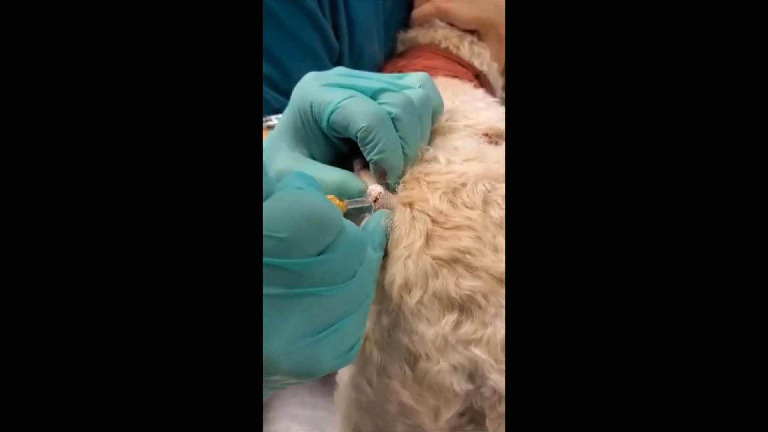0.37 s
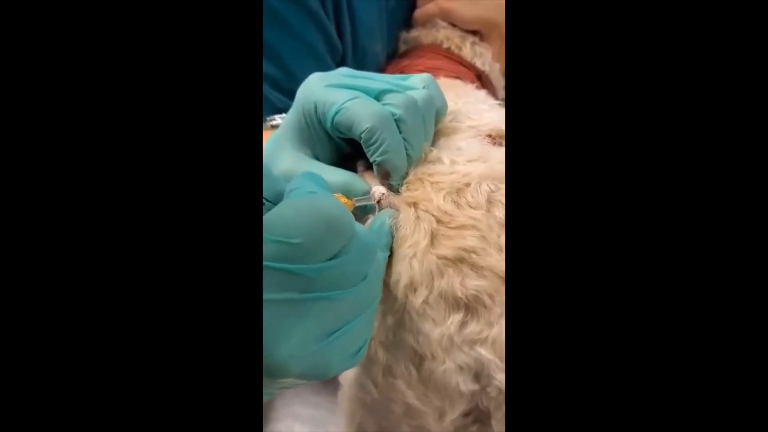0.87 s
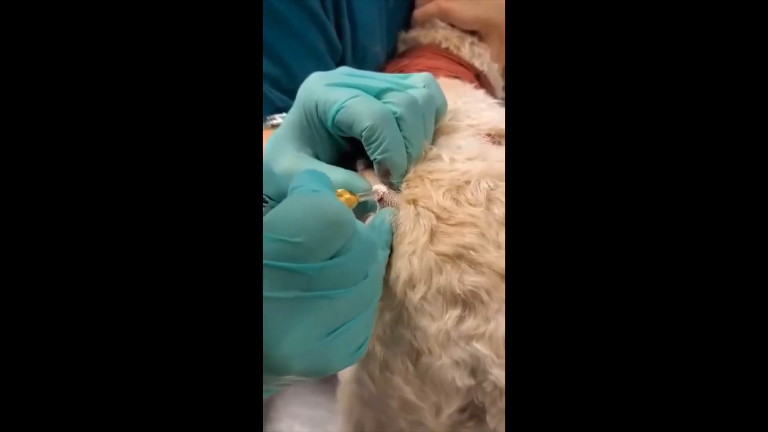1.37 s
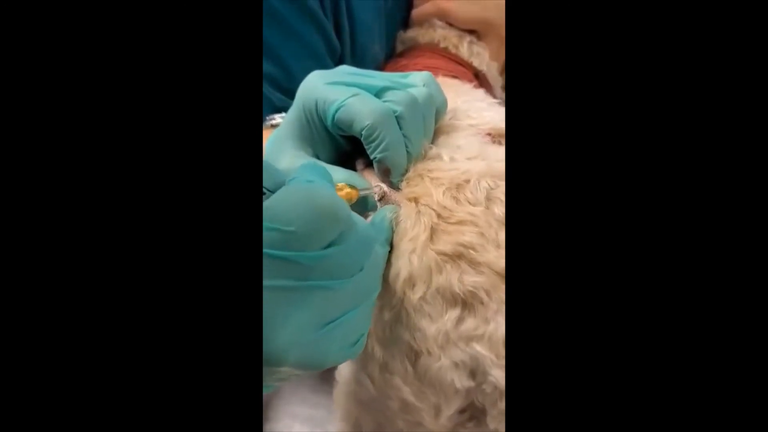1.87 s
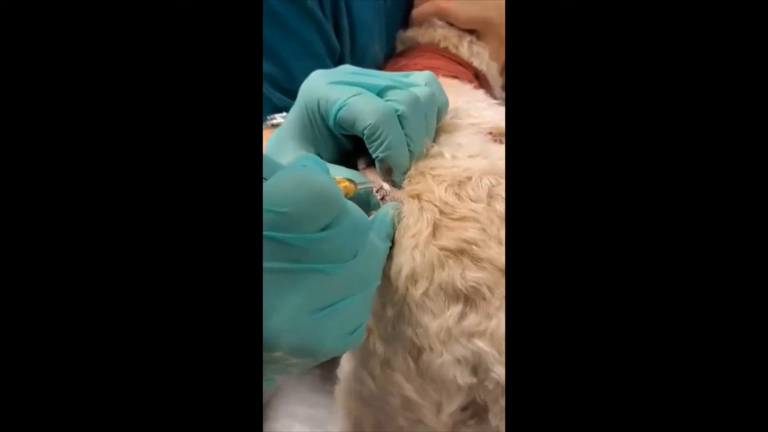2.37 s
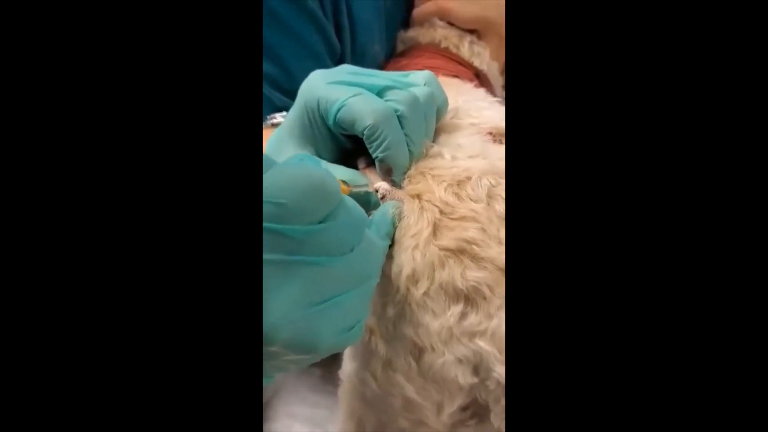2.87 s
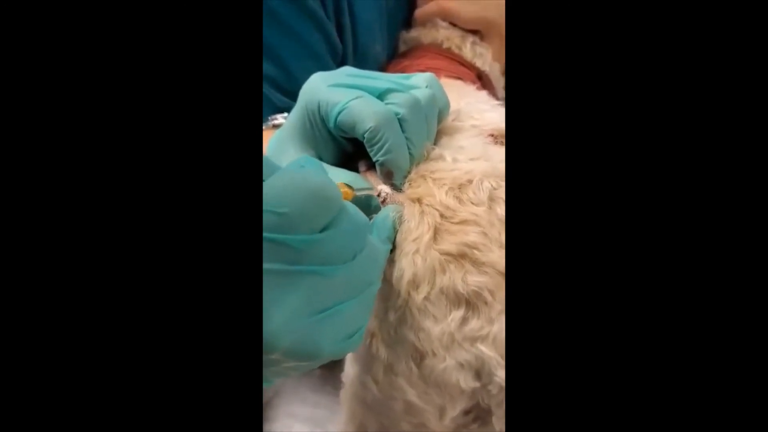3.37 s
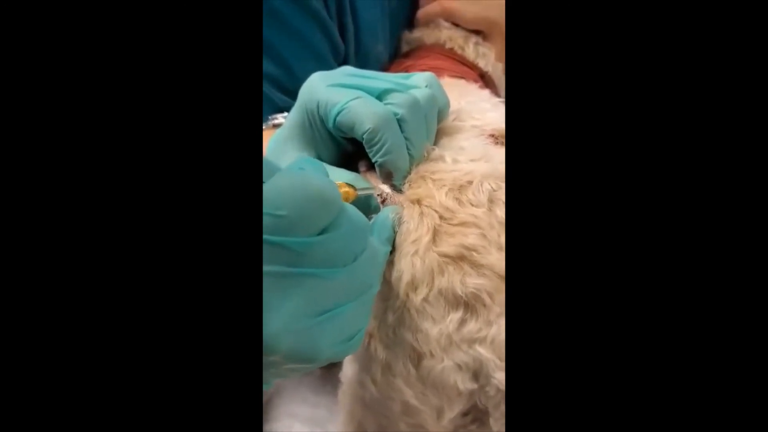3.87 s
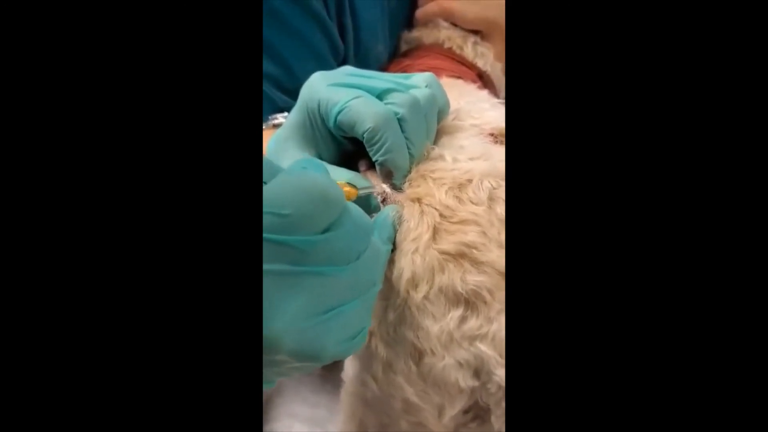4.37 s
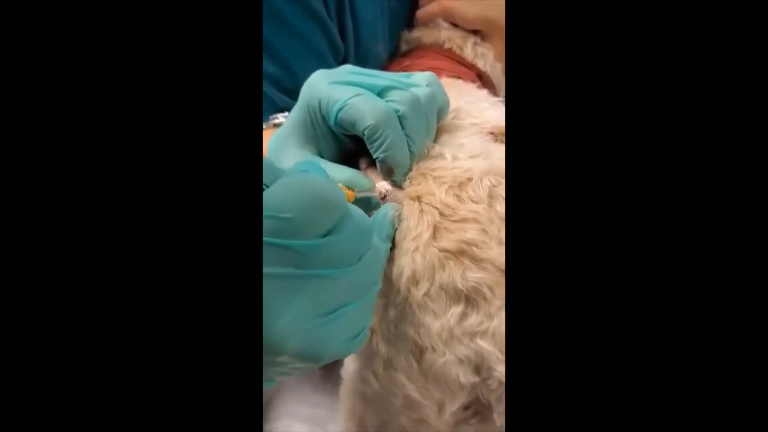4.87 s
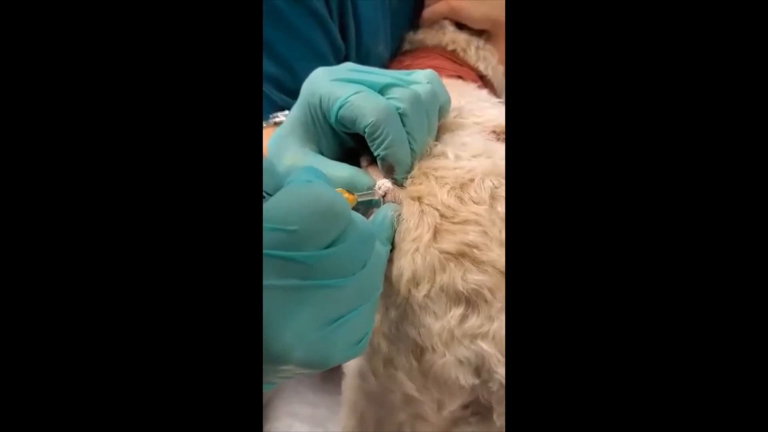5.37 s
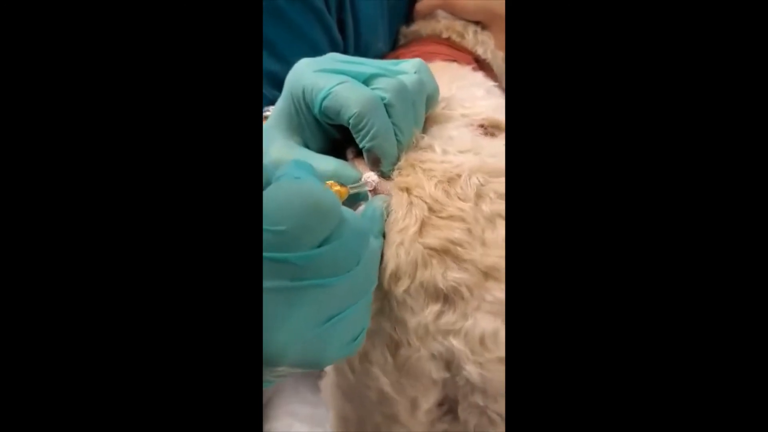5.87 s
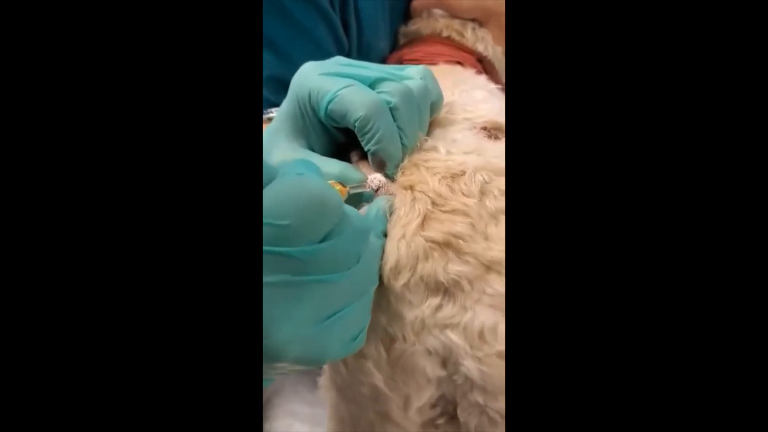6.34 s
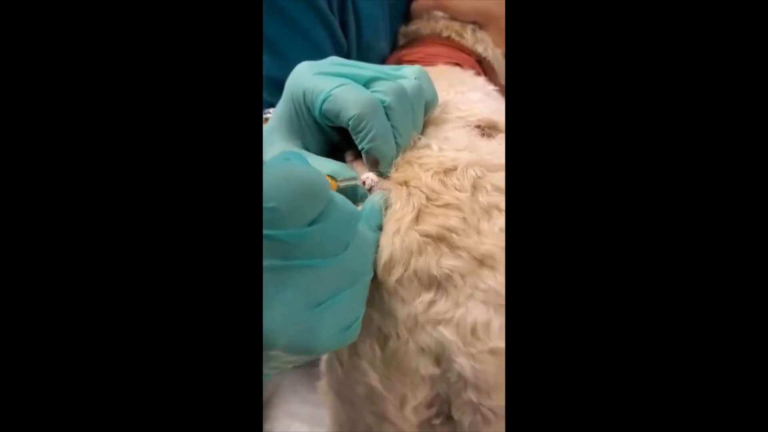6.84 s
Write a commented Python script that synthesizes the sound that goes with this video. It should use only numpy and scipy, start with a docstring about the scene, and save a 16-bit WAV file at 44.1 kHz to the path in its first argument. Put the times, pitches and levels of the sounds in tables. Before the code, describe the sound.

Close stereo pickup in a small, quiet clinic room: a continuous thin hiss of cold gas, very bright and sputtery, surges in quick sweeps. Softer airy spread lies under it. Sparse frosty clicks snap here and there, gloved fingers lightly rustle fur, and low fans drone. The hiss holds steadier around the middle, then pulses again; a barely felt low push comes late, among busier rustling.

```python
"""A freezing pen sprays cold gas on skin, close to a two-port microphone in a small clinic room.
From the start, filtered noise gives the fizz, which surges four or five times a second as the jet sweeps,
and summed wavering tones and low noise give fans, motors and room air. Soft noise strokes soon brush
glove on fur; from 1.4 s decaying sines tick like frost. The surges pause at about 3.5 s, and
after they resume one low sine pulse pushes at 5.5 s; the sweeps go on to the end."""
import sys
import numpy as np
from scipy import signal
from scipy.fft import rfft, irfft
from scipy.io import wavfile
from scipy.ndimage import uniform_filter1d

SR = 44100
rng = np.random.default_rng(int(sys.argv[2]) if len(sys.argv) > 2 else 0)


def transcribe(u):
    """Save the signal u as a 16-bit wav file named by the first command-line argument.

    u: samples, shape (n,) or (channels, n), limited to [-1, 1]; the rate is SR.
    q: integer samples, one column per channel.
    """
    v = np.clip(np.atleast_2d(u).T, -1, 1)
    q = np.round(v * 32767).astype(np.int16)
    wavfile.write(sys.argv[1], SR, q)


def invert_db(level):
    """Linear amplitude ratio for a level in decibels (20 dB per decade), elementwise."""
    return 10 ** (np.asarray(level, dtype=float) / 20)


N = 307818  # samples

# Surges as the jet sweeps over the spot: t/s, swell/dB, half length to 1/e of the swell/s
SWEEP_SURGES = [(0.156, 5.5, 0.034), (0.258, 4, 0.082), (0.38, 3.5, 0.048), (0.633, 3.5, 0.1),
                (0.852, 3.5, 0.11), (1.07, 4, 0.059), (1.27, 6.5, 0.066), (1.49, 4, 0.077),
                (1.717, 3.5, 0.12), (1.927, 5.5, 0.088), (2.18, 4.5, 0.089), (2.43, 6, 0.072),
                (2.62, 4, 0.027), (2.864, 3, 0.062), (3.072, 3.5, 0.024), (3.278, 2, 0.033),
                (3.847, -0.5, 0.013), (4, 2, 0.029), (4.177, 2.5, 0.052), (4.42, 2.5, 0.11),
                (4.657, 5, 0.033), (4.866, 6, 0.063), (5.088, 4.5, 0.059), (5.31, 5, 0.11),
                (5.57, 4.5, 0.05), (5.707, 4.5, 0.038), (5.927, 7.5, 0.13), (6.256, 4.5, 0.045),
                (6.567, 7, 0.082), (6.798, 7, 0.065), (6.97, 4.5, 0.018)]
# Jet between surges: t/s, level/dB, left over right/dB (only its departure from the mean acts)
JET_COURSE = [(0, -51.5, 0.5), (1, -51.5, 0.5), (2.2, -50.5, 1.5), (3.4, -47, 4), (4.4, -49.5, 1.5),
              (5.4, -52.5, 0), (5.7, -50, 3), (5.9, -52.5, -5.5), (6.3, -52, -2), (6.98, -51, -0.5)]
# Colour of the jet at each port: f/Hz, left relative level/dB, right relative level/dB
JET_COLOUR = [(8400, -20, -21), (8760, -21, -8.5), (9560, -8, -8.5), (9890, -6.5, -1), (9860, -15, -4),
              (10740, -12.5, -2.5), (11000, -10, -6), (10930, -4.5, 0.5), (12040, 2, -3), (12540, -5.5, -5),
              (12950, 8, -0.5), (13050, -6, -8)]
# Gas spreading over skin and fur, before surges and spurts:
# t/s, level/dB, left over right/dB (only its departure from the mean acts)
SPREAD_COURSE = [(0, -58.5, 5), (.3, -56, 4.5), (.7, -57.5, 3.5), (2, -58, 5.5), (3.3, -57, 4.5),
                 (4.1, -58, 6), (5.1, -57, 3), (5.6, -58.5, 4), (6.2, -59.5, 6), (6.98, -58.5, 6)]
# Colour of the spreading gas: f/Hz, left relative level/dB, right relative level/dB
SPREAD_COLOUR = [(1850, -10, -12.5), (1995, -24.5, -23.5), (2340, -12.5, -9), (3340, -8, -17),
                 (3370, -11, -14), (4000, -3, -14.5), (4200, -15, -9), (4660, -1.95, -16), (5600, -3, -11),
                 (5700, -3.5, -13), (6850, -3.5, -13), (7100, -4, -14), (7300, -3.5, -14),
                 (7500, -6.5, -13), (8100, -2, -9)]
# Likeness of the two ports once their delay is taken out: f/Hz, coherence/1
PORT_COHERENCE = [(150, 0.94), (330, 0.29), (1000, 0.18), (1900, 0), (2600, 0.42), (4200, 0.11),
                  (5900, 0.25), (7700, 0.65), (9500, 0.18), (11500, 0.34), (12900, 0.45)]
# Frost ticks, level before onset and decay: t/s, level/dB, ring f/Hz, left over right/dB
FROST_TICKS = [(1.448, -33.5, 5900, 12), (2.1609, -35.5, 5200, 17), (2.3673, -32, 5740, 19),
               (3.0017, -35.5, 5600, 19), (3.1143, -40, 6590, 2.5), (3.2033, -36.5, 5680, 21),
               (3.9658, -36, 5600, 20), (4.3765, -33, 5600, 12), (4.616, -34.5, 5240, -5),
               (5.2173, -34.5, 4660, -2), (5.474, -42, 5370, 6.0), (6.013, -38, 5630, -2),
               (6.2523, -40, 5900, 21), (6.2573, -39, 5500, 14), (6.2625, -41, 5200, 14)]
# Swishes of glove on fur: t/s, level/dB, centre f/Hz, half width to 1/e/Hz, rise from 1/e/s, left over right/dB
GLOVE_SWISHES = [(0.22, -58, 4000, 2500, 0.014, 6), (2.4, -57.5, 3500, 2000, 0.015, 6),
                 (2.843, -57, 4200, 2000, 0.012, 8), (3.455, -62, 4000, 2500, 0.027, 10),
                 (4.597, -59, 6000, 1500, 0.016, 2), (4.792, -59, 5360, 900, .014, 12),
                 (5.222, -54.5, 2300, 1500, 0.0075, 2), (5.26, -56.5, 2800, 1500, 0.014, 6),
                 (5.835, -55, 4730, 2500, 0.026, 10.5), (5.87, -54, 6500, 2940, 0.069, 1),
                 (5.915, -55.5, 5200, 1200, 0.05, 1)]
# One low soft push: t/s, level/dB, f/Hz, half length to 1/e/s
LOW_PUSH = (5.5, -55, 26, 0.06)
# Hum of fans and motors: f/Hz, level/dB, left over right/dB, wavering rate/Hz, steady share of power/1
MOTOR_TONES = [(26.7, -79.5, -3, 1.7, 0.5), (60.3, -77, -8, 4.7, 0.07), (77.8, -64, 2, 11.3, 0.54),
               (106.2, -69, 6, 11.2, 0), (119.5, -68.5, 2.5, 1.5, 1), (155.9, -63.5, -0.3, 3.5, 0.91),
               (234.2, -75, -8.5, 4.2, 0.33), (408.5, -81, -20.5, 2.6, 0.84), (474, -82, 0, 1.2, 0.83),
               (530, -90.5, 2, 0.45, 1), (825, -85, 8, 0.48, 0.94), (954, -93, 15, 0.45, 0.9),
               (1234, -86.5, -11, 0.21, 0.6)]
# Colour of the room air: f/Hz, left relative level/dB, right relative level/dB
AIR_COLOUR = [(20.1, -9, 4), (44.5, 3, -6), (88, 3.5, 7.5), (125, 0.5, 2.5), (209, -2.5, 2),
              (327, -5.5, -4.5), (367, -3, -7), (710, -7.5, -5.5), (1025, -11.5, -10.5), (1280, -14, -15),
              (1660, -38, -22), (2100, -23, -48)]


def evened(x):
    """Normalisation: the root mean square becomes one."""
    return x / np.sqrt(np.mean(x ** 2) + 1e-20)


def read(points, hz):
    """Interpolation: spectrum columns are linear in level over log frequency."""
    f, *columns = np.transpose(points)
    return np.array([np.interp(np.log(hz + 1), np.log(f + 1), c) for c in columns])


def sides(pan_db):
    """Interaural level difference: half is added at the left and half taken off at the right."""
    return invert_db(np.array([pan_db / 2, -pan_db / 2]))


def smooth_chance(width_s):
    """Low-pass random process: two running means of width_s leave a slow drift of unit rms."""
    size = max(round(width_s * SR), 1)
    drift = uniform_filter1d(rng.standard_normal(N), size)
    return evened(uniform_filter1d(drift, size))


def noise(colour, lo_hz, hi_hz, patchy_db, size, bins=10, hops=8):
    """Coherence: the right port shares part of the left's noise, delayed; patches span bins and hops."""
    port_lag_s = 0.000156
    frames = 4 * N // size + 5
    hz = np.fft.rfftfreq(size, 1 / SR)
    a, b, c, d, patches = rng.standard_normal((frames, len(hz), 5)).T
    patches = uniform_filter1d(patches, bins, 0)
    patches = evened(uniform_filter1d(patches, hops, 1))

    coherence = np.clip(read(PORT_COHERENCE, hz)[0], -1, 1)[:, None]
    left, separate = a + 1j * b, c + 1j * d
    delay = np.exp(-2j * np.pi * hz * port_lag_s)[:, None]
    right = coherence * left * delay + np.sqrt(1 - coherence ** 2) * separate
    z = np.array([left, right])

    # steep skirts outside the band
    inside = 1 / np.sqrt((1 + (lo_hz / (hz + 1)) ** 16) * (1 + (hz / hi_hz) ** 16))
    z *= (inside * invert_db(read(colour, hz)))[:, :, None] * invert_db(patchy_db * patches)
    out = signal.istft(z, nperseg=size, noverlap=3 * size // 4)[1][:, :N]
    return out / np.std(out.mean(0))


def played(course, sound, swell_db, lean_db):
    """Amplitude modulation: level and side follow a course plus the surges."""
    s, level_db, pan_db = np.transpose(course)
    t = np.arange(N) / SR
    pan_db = np.interp(t, s, pan_db) + lean_db
    # the colour already holds the mean side
    return sound * invert_db(np.interp(t, s, level_db) + swell_db) * sides(pan_db - pan_db.mean())


def sweep_swell():
    """Superposition in level: each sweep over the spot adds a bell-shaped swell in dB."""
    t = np.arange(N) / SR
    return sum(db * np.exp(-((t - s) / length) ** 2) for s, db, length in SWEEP_SURGES)


def flash_spurts():
    """Flash evaporation: droplets turn to gas at the nozzle in millisecond spurts and slower flutter."""
    return evened(invert_db(1.1 * smooth_chance(0.0015) + 0.8 * smooth_chance(0.017)))


def jet(swell_db, spurts):
    """Jet noise: a high broad band follows the spurts and swells with each sweep."""
    fizz = noise(JET_COLOUR, lo_hz=7820, hi_hz=14050, patchy_db=3, size=512, bins=4, hops=16)
    lean_db = 0.8 * swell_db  # a swell leans to the left
    return played(JET_COURSE, fizz * spurts, swell_db, lean_db)


def spreading_gas(swell_db, spurts):
    """Surface-flow noise: a lower band follows the same spurts and sweeps more weakly."""
    body = noise(SPREAD_COLOUR, lo_hz=1085, hi_hz=8920, patchy_db=2.0, size=512, bins=5, hops=14)
    return played(SPREAD_COURSE, body * spurts ** 0.45, 0.27 * swell_db, 0)


def ticks():
    """Impulse excitation: a snap, its echo off the glove and smaller cracks each start a damped ring."""
    onset_s, ring_t60_s = 0.0004, 0.004
    echo_s, echo_db = 0.0021, -5
    crackle_db, crackle_t60_s, crackles_per_s = -7, 0.06, 3000
    t = np.arange(1500) / SR
    out = np.zeros((2, N + len(t)))
    for s, db, hz, pan_db in FROST_TICKS:
        ring = np.minimum(t / onset_s, 1) * invert_db(-60 * t / ring_t60_s) * np.sin(2 * np.pi * hz * t)
        when, size = rng.random((2, len(t)))
        cracks = (when < crackles_per_s / SR) * (2 * size - 1) * (t > echo_s)
        impulses = invert_db(crackle_db - 60 * t / crackle_t60_s) * cracks
        impulses[0] = 1  # the snap
        impulses[round(echo_s * SR)] = invert_db(echo_db)
        tick = signal.fftconvolve(impulses, ring)[:len(t)]
        at = round(s * SR)
        out[:, at:at + len(t)] += invert_db(db) * sides(pan_db)[:, None] * tick
    return out[:, :N]


def swishes():
    """Friction noise: broad grainy bands follow strokes that rise faster than they fall."""
    t = np.arange(N) / SR
    hz = np.fft.rfftfreq(N, 1 / SR)
    out = np.zeros((2, N))
    grain = evened(invert_db(1.2 * smooth_chance(0.00079)))
    for s, db, centre_hz, width_hz, rise_s, pan_db in GLOVE_SWISHES:
        passband = np.exp(-((hz - centre_hz) / width_hz) ** 2)
        band = irfft(rfft(rng.standard_normal((2, N))) * passband, N)
        stroke = np.exp(-((t - s) / np.where(t < s, rise_s, 1.8 * rise_s)) ** 2)
        out += invert_db(db) * sides(pan_db)[:, None] * evened(band) * stroke
    return out * grain


def thump():
    """Gated oscillation: a few low cycles lie under a soft bell-shaped swell."""
    s, db, hz, length = LOW_PUSH
    t = np.arange(N) / SR - s
    return invert_db(db) * np.exp(-(t / length) ** 2) * np.sin(2 * np.pi * hz * t)


def hum():
    """Narrow-band modulation: each fan or motor tone is a steady sine plus a wavering part."""
    t = np.arange(N) / SR
    out = np.zeros((2, N))
    for hz, db, pan_db, waver_hz, steady in MOTOR_TONES:
        steady = np.clip(steady, 0, 1)
        drift = smooth_chance(0.48 / waver_hz) + 1j * smooth_chance(0.45 / waver_hz)
        swing = np.sqrt(2 * steady) + np.sqrt(1 - steady) * drift
        tone = (swing * np.exp(2j * np.pi * (hz * t + rng.random()))).real
        out += invert_db(db) * sides(pan_db)[:, None] * tone
    return out


def room_air():
    """Ambient noise: low coloured noise with slow patches, partly coherent between the ports."""
    return invert_db(-62) * noise(AIR_COLOUR, lo_hz=8.6, hi_hz=2540, patchy_db=1.72, size=4096)


def scene():
    """Superposition: the pressures of all sources add at the two ports."""
    swell_db, spurts = sweep_swell(), flash_spurts()
    spray = jet(swell_db, spurts) + spreading_gas(swell_db, spurts)
    return spray + ticks() + swishes() + thump() + hum() + room_air()


def top_cut(x):
    """Nothing passes above the cut-off."""
    return signal.sosfilt(signal.butter(12, 14150, fs=SR, output="sos"), x)


def record(dry):
    """Band limitation: a linear-phase low-pass removes the highest treble."""
    low_pass = signal.firwin(numtaps=2 ** 11 - 1, cutoff=13060, window=("kaiser", 9), fs=SR)
    limited = signal.oaconvolve(dry, low_pass[None], "same")
    return top_cut(limited)


dry = scene()
out = record(dry)
transcribe(out)
```